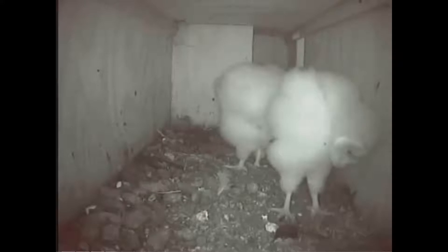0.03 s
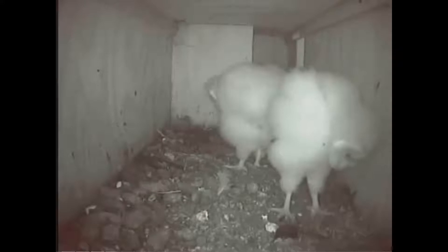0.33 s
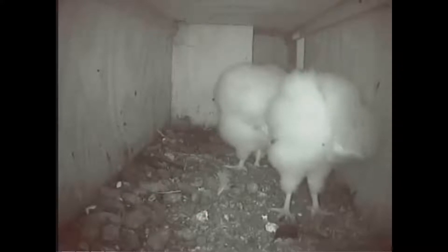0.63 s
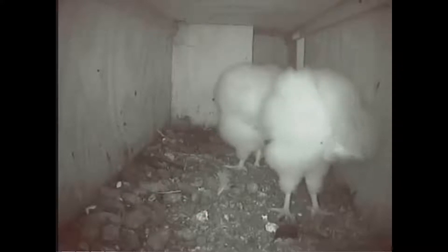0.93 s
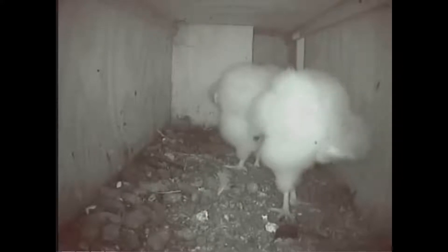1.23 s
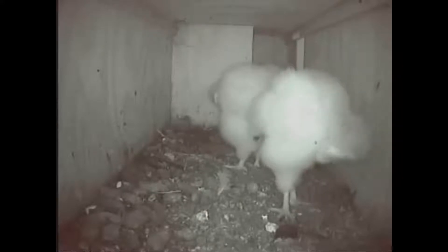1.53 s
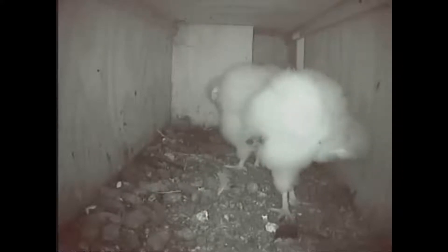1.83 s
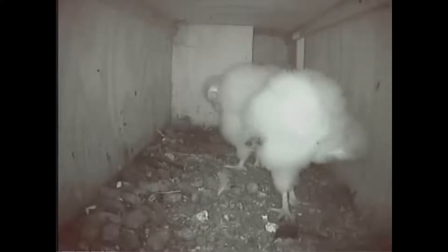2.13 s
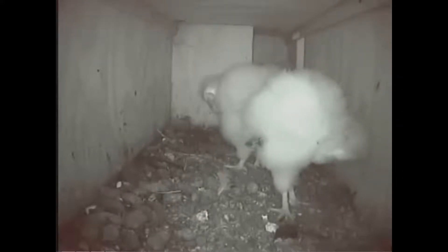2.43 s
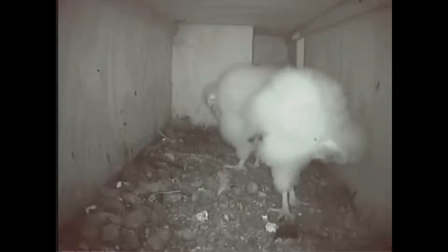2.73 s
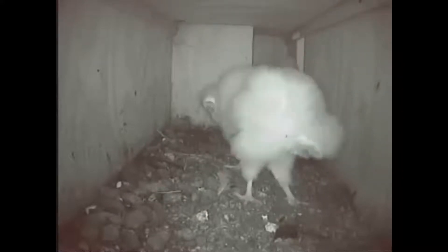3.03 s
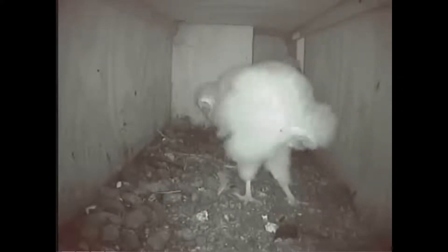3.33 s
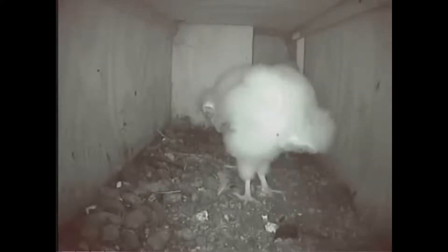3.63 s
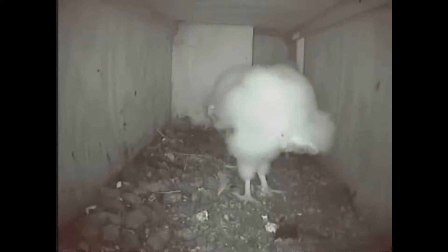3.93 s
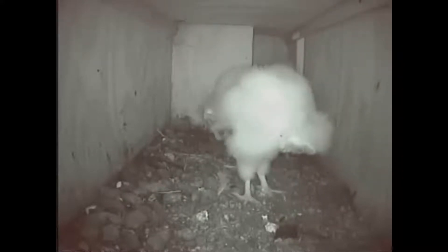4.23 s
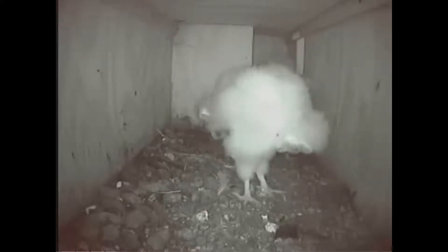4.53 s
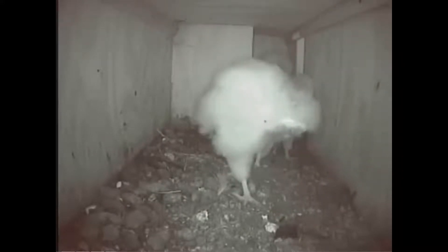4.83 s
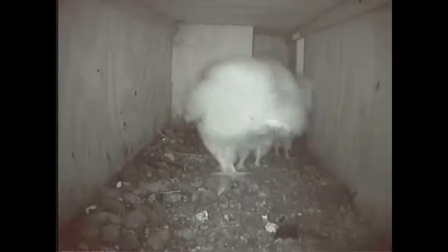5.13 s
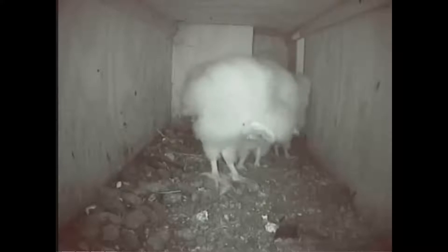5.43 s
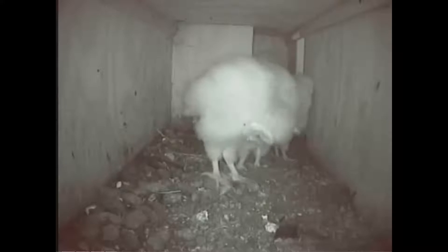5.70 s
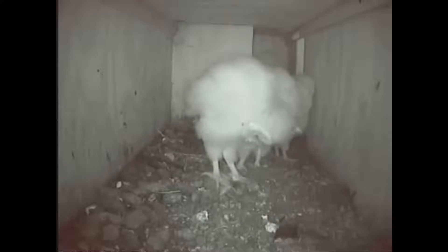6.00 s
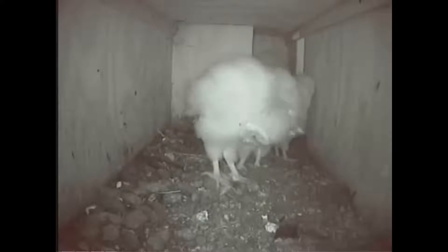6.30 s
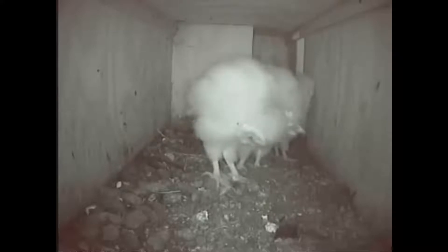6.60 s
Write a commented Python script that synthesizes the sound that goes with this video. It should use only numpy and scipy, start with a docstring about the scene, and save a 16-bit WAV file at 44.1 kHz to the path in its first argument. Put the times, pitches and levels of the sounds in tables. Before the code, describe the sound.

Owl chicks are heard close up through a small microphone inside a wooden nest box, over a steady low rumble and faint hiss. From about 0.3 to 0.7 seconds comes a harsh, breathy begging rasp that swells and sags, with a hollow ring and faint thin whistles in it. Around 1 second a foot knocks softly on the floor board and crunches dry litter. More steps land at 2.7 and 3.4 seconds, each a short cluster of hollow thumps. A second rasp runs from 3.8 to 4.2 seconds. The feet then get busier, with steps at 4.4, 4.7, 5.0 and 5.4 seconds, the firmest near 4.7, along with tiny claw ticks and very faint feather rubbing. A third, slightly softer rasp lasts from 5.5 to 5.9 seconds. After that, little but the rumble and hiss remains until the end, near 7 seconds.

```python
"""Inside a wooden nest box, a small camera microphone hears two owl chicks.
They beg with three long rasping hisses: breath is chopped up in the voice box, shaped by throat
and beak, and rings between the walls. Between the calls they shift their feet: claws crunch in
the litter, the floor board knocks and booms, and downy feathers rub softly.
A steady low rumble and faint hiss lie under everything."""
import sys
import numpy as np
from scipy import signal
from scipy.fft import rfft, irfft
from scipy.io import wavfile
from scipy.ndimage import uniform_filter1d

SR = 44100
rng = np.random.default_rng(int(sys.argv[2]) if len(sys.argv) > 2 else 0)


def wav_out(sig):
    """Save sig, one row per channel (or a flat mono array), as 16-bit PCM at SR to the path in sys.argv[1]."""
    wavfile.write(sys.argv[1], SR, np.round(np.clip(np.atleast_2d(sig).T, -1, 1) * 32767).astype(np.int16))


N = 298116
TIME = np.arange(N) / SR
FREQS = np.maximum(np.arange(N // 2 + 1) * SR / N, 1)


def from_db(db):
    """Turn decibels into a number to multiply by."""
    return 10 ** (np.asarray(db) / 20)


def rms_one(x):
    """Scale a signal so that its average strength (rms) is 1."""
    return x / np.sqrt(np.mean(x ** 2) + 1e-20)


def tone_curve(points):
    """Join a few (frequency, level) points into a gain for every frequency."""
    hz, db = np.transpose(points)
    return from_db(np.interp(np.log(FREQS), np.log(hz), db))


def colour(x, gain):
    """Turn each frequency up or down by its gain."""
    return irfft(rfft(x) * gain, N)


def flutter(per_s):
    """A smooth random wobble of typical size 1; a higher per_s makes it quicker."""
    return rms_one(colour(rng.standard_normal(N), np.exp(-(FREQS / per_s) ** 2)))


def swells(rows, level_db):
    """A loudness curve with one smooth bump for each row."""
    return sum(from_db(db + level_db) * np.exp(-((TIME - s) / half_s) ** 2) for s, half_s, db in rows)


# Tone of the background noise: (frequency [Hz], relative level [dB])
BACKGROUND_TONE = [(12, -6), (24, 1), (42, 2), (58, -6), (80, -8.5), (120, -10), (200, -16), (320, -24),
                   (600, -29.5), (1200, -33.5), (2500, -35), (5000, -37), (6500, -38.5), (7200, -43.5)]

def background_noise(level_db):
    """A steady low rumble and faint hiss lie under everything."""
    return from_db(level_db) * rms_one(colour(rng.standard_normal(N), tone_curve(BACKGROUND_TONE)))


# Notes at which the air in the box rings: (pitch [Hz], width [Hz], boost [dB])
BOX_NOTES = [(483, 33, 13), (579, 54, 10.5), (770, 9.5, 4), (872, 42, 8.5), (1027, 11, 8), (1062, 97, 4.5),
             (1102, 11, 3.5), (1380, 190, 8), (1483, 18, 2.5), (2340, 35, 4.5), (2570, 27, 3),
             (2690, 24, 7), (2940, 26, 5), (3070, 13, 7.5), (3170, 85, 6.5), (4010, 30, 7), (4385, 38, 3.5),
             (5100, 35, 5), (5800, 45, 5)]

def box_ring(direct):
    """Sound bounces between the walls, so some notes ring on top of the direct sound."""
    out = direct
    for hz, width_hz, boost_db in BOX_NOTES:
        b, a = signal.iirpeak(hz, hz / width_hz, fs=SR)
        out = out + (from_db(boost_db) - 1) * signal.lfilter(b, a, direct)
    return out


# How restless the chicks are: (time [s], relative level [dB])
RESTLESSNESS = [(0.1, -64), (0.35, -63.5), (1.9, -64.5), (2.6, -61.5), (2.85, -64.5), (3.06, -67),
                (4.86, -63.5), (6.65, -68)]
# Single firmer rubs: (middle time [s], half length [s], relative level [dB])
FIRM_RUBS = [(0.872, 0.094, -73.5), (2.878, 0.031, -77), (4.719, 0.01, -53.5), (5.365, 0.031, -56.5)]
# Tone of the rubbing: (frequency [Hz], relative level [dB])
RUB_TONE = [(50, -23.5), (110, 5), (200, 0.5), (300, 1.5), (420, -15), (600, -21.5), (1200, -25),
            (2500, -70), (7000, -35.5)]

def shuffle(level_db, rubs_db, uneven_db):
    """Soft feathers and toes rub the floor in faint uneven strokes, a few of them firmer."""
    times, restless_db = np.transpose(RESTLESSNESS)
    level = from_db(np.interp(TIME, times, restless_db) + level_db) + swells(FIRM_RUBS, rubs_db)
    rub = rng.standard_normal(N) * from_db(uneven_db * flutter(per_s=31))
    return level * rms_one(box_ring(colour(rub, tone_curve(RUB_TONE))))


# Claw tips catching: (time [s], level [dB])
CLAW_CATCHES = [(0.982, -71), (.998, -75), (2.741, -76), (3.374, -75), (3.408, -67), (4.727, -65.5),
                (4.750, -62)]

def claw_ticks(pitch_hz, rise_s):
    """A claw tip catches on something hard and gives a tiny ping."""
    out = 0
    for s, db in CLAW_CATCHES:
        age = np.clip(TIME - s, 0, 1)
        level = from_db(db) * age / rise_s * np.exp(1 - age / rise_s)
        out = out + level * np.sin(2 * np.pi * pitch_hz * age)
    return out


# Notes of the floor board: (pitch [Hz], relative level [dB], time to fade by 60 dB [s])
BOARD_NOTES = [(48.3, -3.5, .42), (60.3, -12, 0.56), (72.7, -10.5, .36), (89, -10, 0.057),
               (97.3, -14, 0.51), (127.2, -10.5, 0.2), (170.4, -7, 0.24), (194.7, 3.5, 0.14),
               (226, 1, 0.082), (288.3, 3.5, 0.12), (327, -5, 0.14), (409, -8.5, 0.08), (477, 3, 0.066),
               (575, 2.5, .09), (599, -7, .13), (890, -4.5, 0.045), (1150, -14, .03)]
# Each step is a list of touches, as the foot rolls from claws and toes to the body's full weight:
# (time [s], relative knock level [dB], pitch that this spot favours [Hz], relative crunch level [dB])
STEPS = [
    [(.843, -58, 405, -64), (.877, -57, 350, -59), (.908, -51, 327, -69)],
    [(.9847, -43.5, 513, -48), (.991, -46.5, 485, -59), (.9971, -38, 312, -48), (1.0067, -39.5, 226, -57.5),
     (1.013, -32.5, 59, -65), (1.0266, -31, 82, -74)],
    [(2.740, -52, 283, -49), (2.7467, -37, 370, -64), (2.7501, -42, 324, -60), (2.7527, -40, 415, -72),
     (2.7568, -46, 442, -71), (2.7635, -38, 63, -68), (2.769, -38, 305, -52.5)],
    [(3.3491, -40, 340, -56), (3.3522, -38.5, 326, -68), (3.3722, -28, 262, -45), (3.375, -41, 600, -55),
     (3.3801, -27, 169, -74)],
    [(3.411, -51, 110, -50), (3.4142, -35.5, 48.3, -63), (3.4186, -34.5, 373, -59),
     (3.4281, -35, 54.5, -73.5)],
    [(4.3775, -50, 840, -56.5), (4.3798, -34.5, 432, -54), (4.383, -47, 1010, -54), (4.3932, -30, 271, -64),
     (4.4002, -27.5, 148, -64), (4.4118, -38, 406, -72), (4.4166, -45, 138, -77),
     (4.4257, -36.5, 51.2, -80)],
    [(4.7268, -45, 133, -47), (4.728, -45, 481, -60), (4.7366, -25.5, 125.6, -62), (4.7502, -26, 291, -47),
     (4.7556, -32, 365, -49), (4.7699, -38.5, 102, -55), (4.7968, -35, 64.3, -80)],
    [(4.9872, -34.5, 117, -52.5), (4.9925, -35.5, 380, -64), (5.0014, -37, 77.4, -61)],
    [(5.0472, -37, 77.3, -76), (5.057, -41, 333, -50), (5.059, -50, 1090, -58), (5.0649, -35, 133, -64),
     (5.0658, -38, 75, -67), (5.074, -46, 199, -55)],
    [(5.3085, -42.5, 126, -73), (5.358, -39.5, 417, -60), (5.3643, -39, 164, -55), (5.371, -49, 490, -55),
     (5.381, -42, 330, -61), (5.3817, -36.5, 120, -65)],
]

def board_knocks(level_db, thud, spot_db, spot_octaves, push_cycles):
    """Each foot bends the board and lets go; the slower the push, the lower the notes it wakes."""
    t, out = TIME[:SR // 2], np.zeros(N)
    hz, note_db, fade_s = np.transpose(BOARD_NOTES)
    rings = from_db(-60 * t / fade_s[:, None]) * np.cos(2 * np.pi * hz[:, None] * t)
    for s, peak_db, spot_hz, _ in np.concatenate(STEPS):
        favour_db = spot_db * np.exp(-(np.log2(hz / spot_hz) / spot_octaves) ** 2)
        board = from_db(note_db + favour_db + rng.standard_normal(len(hz))) @ rings
        board = board + thud * np.exp(-t / 0.0004)  # the litter gives way with a dead thud
        progress = t * spot_hz / push_cycles
        soft_landing = np.sqrt(np.sin(np.pi * progress).clip(0)) * (progress < 1)
        push = np.sin(2 * np.pi * progress) * soft_landing
        knock = signal.fftconvolve(push, board)[:len(t)]
        at = round(s * SR)
        out[at:at + len(t)] += from_db(peak_db + level_db) * knock / np.abs(knock).max()
    return out


# Tone of the dry litter on the floor: (frequency [Hz], relative level [dB])
LITTER_TONE = [(150, -12), (400, 7.5), (600, 7), (760, -5.5), (1200, -3), (1500, -13.5), (2100, -25.5),
               (3100, -25), (7000, -47)]

def litter_crunch(level_db, rise_s, fall_s, grain_db):
    """At each touch in STEPS, dry pellets crumble under the claws in a short burst of grains."""
    power = 0
    for s, *_, crunch_db in np.concatenate(STEPS):
        age = np.clip(TIME - s, 0, 1)
        burst = from_db(crunch_db) * (1 - np.exp(-age / rise_s)) * np.exp(-age / fall_s)
        power = power + burst ** 2
    grains = rms_one(rng.standard_normal(N) * from_db(grain_db * flutter(per_s=180)))
    return from_db(level_db) * colour(grains * np.sqrt(power), rms_one(tone_curve(LITTER_TONE)))


# Moments when a call turns hollow: (middle time [s], half length [s], relative level [dB])
HOLLOW_MOMENTS = [(0.35, 0.033, -56), (.475, .035, -56), (.595, 0.068, -53.5), (0.676, 0.031, -51),
                  (4.004, 0.014, -47.5), (4.122, 0.017, -58), (5.694, 0.014, -59), (5.913, 0.027, -60)]

def hollow_ring(level_db, waver_hz):
    """The lowest note of the air in the box swells into a hollow tone under the rasp."""
    hz = BOX_NOTES[0][0] + waver_hz * flutter(per_s=77)
    return swells(HOLLOW_MOMENTS, level_db) * np.sqrt(2) * np.sin(2 * np.pi * np.cumsum(hz) / SR)


# Brief whistles, and the falling chirps that end a call:
# (start [s], end [s], first pitch [Hz], last pitch [Hz], level [dB])
WHISTLE_NOTES = [ (.255, 0.418, 5410, 5250, -76), (0.398, 0.492, 5300, 5280, -75),
                 (.30, .47, 5900, 5840, -80.5), (0.498, 0.621, 6130, 6220, -82),
                 (.28, 0.461, 3065, 2990, -75.5), (.28, 0.432, 593, 616, -60.5),
                 (.385, .49, 1325, 1300, -68.5), (0.665, .715, 1094, 1053, -65),
                 (.698, .720, 2900, 2800, -71), (3.985, 4.054, 1136, 1168, -62),
                 (4.045, 4.085, 5120, 5180, -79), (5.52, 5.577, 3060, 3060, -82),
                 (5.914, 5.929, 3180, 2660, -71)]

def whistles(waver_share):
    """A ringing band of the hiss narrows for a moment into a thin, unsteady tone."""
    out = np.zeros(N)
    waver = 1 + waver_share * flutter(per_s=220)
    for start, end, first_hz, last_hz, db in WHISTLE_NOTES:
        span = slice(round(start * SR), round(end * SR))
        progress = np.linspace(0, 1, len(out[span]))
        hz = (first_hz + (last_hz - first_hz) * progress) * waver[span]
        swell = np.sqrt(progress * (1 - progress)) * 2
        out[span] += from_db(db) * swell * np.sqrt(2) * np.sin(2 * np.pi * np.cumsum(hz) / SR)
    return out


# Bands where throat and beak ring, coloured by where the chick sits; one table for each call:
# (pitch [Hz], rough width [Hz], relative level [dB])
FIRST_VOICE = [(303, 160, 3.5), (457, 230, 0.5), (726, 160, 0.5), (833, 50, 1), (1015, 140, -4),
               (1180, 115, -5.5), (1304, 90, -7.5), (1500, 180, -11), (1700, 91, -12.5), (1940, 79, -14.5),
               (2310, 240, -17.5), (2730, 340, -9.5), (2900, 200, -8.5), (3030, 87, -12), (3260, 280, -15),
               (3900, 640, -32), (4430, 75, -21.5), (4630, 200, -25.5), (4970, 370, -24), (5320, 220, -24),
               (5850, 270, -26.5), (6400, 690, -32.5)]
SECOND_VOICE = [(326, 180, 3), (479, 59, 2.5), (690, 130, -3), (865, 42, -4), (1072, 240, -4.5),
                (1300, 70, -16), (1523, 70, -15), (1750, 160, -18.5), (2040, 150, -22), (2340, 200, -20.5),
                (2790, 250, -18.5), (2980, 150, -21), (3216, 92, -16.5), (3400, 190, -22), (3900, 210, -25),
                (4550, 320, -31.5), (5040, 150, -33), (5250, 220, -28.5), (6040, 490, -32.5),
                (6550, 180, -32.5)]
THIRD_VOICE = [(336, 130, -2.5), (485, 180, -9), (730, 220, -15.5), (947, 130, -8.5), (1158, 57, -9),
               (1348, 38, -17), (1630, 400, -26), (2170, 260, -21), (2370, 190, -18), (2700, 280, -21.5),
               (3016, 200, -16), (3350, 360, -21.5), (4230, 470, -35), (4970, 660, -32), (5800, 410, -33.5),
               (6300, 400, -34.5)]
# How a call's three parts (low throat, middle rasp, high beak hiss) follow the breath:
# (swell factor, usual sag by the end [dB], stops early by [s], fade in [s], fade out [s])
BREATH_RESPONSE = [(1.8, 3, 0.0092, 0.014, 0.039), (2.6, 6, 0.0024, 0.0094, 0.026),
                   (1.6, 3.5, .006, .012, 0.031)]
# The calls: (start [s], hardest push [s], end [s], rasp delay [s], hiss stops earlier by [s],
# base swell of throat and rasp [dB], base swell of hiss [dB], sag factor,
# throat level [dB], rasp level [dB], hiss level [dB], roughness [dB])
BEGGING_CALLS = [ (0.256, 0.557, 0.724, 0.022, 0.017, 4, 3.5, 1.25, -50.5, -61, -71.5, 0.1),
                 (3.757, 4.012, 4.16, 0.0018, 0.012, 4, 5.5, 1.5, -52, -70, -75.5, 0.8),
                 (5.513, 5.805, 5.934, .0011, 0.021, 3, 4, 0.71, -55.5, -66, -76, 0.6)]

def begging_call(beg, voice_bands, glide_share, wander_share):
    """Breath, chopped unevenly by the voice box, rings in throat and beak; it swells, sags and stops."""
    start, push, end, rasp_delay_s, hiss_early_s, swell_db, hiss_swell_db, tiring, *peaks, rough_db = beg
    chop = from_db(rough_db * flutter(per_s=200))
    effort = np.sin(np.pi / 2 * np.clip((TIME - start) / (push - start), 0, 1)) ** 2
    spent = np.clip((TIME - push) / (end - push), 0, 1)
    # the pitch rises with the push and strays a little at random
    bend = glide_share * (effort - spent - .5) + wander_share * flutter(per_s=25.7)
    parts = [(0, 2100, start, end, swell_db),  # throat
             (2100, 3700, start + rasp_delay_s, end, swell_db),  # rasp
             (3700, SR, start, end - hiss_early_s, hiss_swell_db)]  # beak hiss
    out = 0
    for part, peak_db, response in zip(parts, peaks, BREATH_RESPONSE):
        low_hz, high_hz, begin, stop, rise_db = part
        swell_factor, sag_db, early_s, fade_in_s, fade_out_s = response
        level_db = peak_db - swell_factor * rise_db * (1 - effort) - tiring * sag_db * spent
        fade = np.clip(np.minimum((TIME - begin) / fade_in_s, (stop - early_s - TIME) / fade_out_s), 0, 1)
        # each band filters twice, so the gaps between bands stay quiet
        power = sum((from_db(db) / (1 + ((FREQS - hz) / (0.53 * width)) ** 2)) ** 2
                    for hz, width, db in voice_bands if low_hz <= hz < high_hz)
        air = colour(chop * rng.standard_normal(N), np.sqrt(power))
        gliding = np.interp(np.cumsum(1 + bend * fade), np.arange(N), air)  # faster sounds higher
        voice = box_ring(gliding)
        steady = voice / np.sqrt(uniform_filter1d(voice ** 2, size=1800) + 1e-12)  # an even breath
        out = out + fade * from_db(level_db) * steady
    return out


def scene():
    """Calls and feet over the steady background noise, in one channel."""
    calls = sum(begging_call(beg, voice, glide_share=.012, wander_share=.006)
                for beg, voice in zip(BEGGING_CALLS, [FIRST_VOICE, SECOND_VOICE, THIRD_VOICE]))
    calls += whistles(waver_share=.012) + hollow_ring(level_db=-1.0, waver_hz=14.65)
    feet = board_knocks(level_db=-1.0, thud=0.98, spot_db=8.0, spot_octaves=0.27, push_cycles=1.13)
    feet += litter_crunch(level_db=1.5, rise_s=0.0022, fall_s=0.0055, grain_db=5.5)
    feet += claw_ticks(pitch_hz=3100, rise_s=0.0007)
    feet += shuffle(level_db=-4.0, rubs_db=-0.5, uneven_db=2.0)
    return (calls + feet + background_noise(level_db=-60))[None]


def record(dry):
    """The camera cuts the high treble, adds a faint wide hiss and rests slightly above zero."""
    sound_top_hz, hiss_top_hz, hiss_db, offset = 7800, 15800, -94.5, .0197
    treble_cut = signal.cheby2(14, 50, sound_top_hz, fs=SR, output="sos")
    hiss_cut = signal.ellip(10, .1, 70, hiss_top_hz, fs=SR, output="sos")
    hiss = from_db(hiss_db) * rng.standard_normal(N)
    return signal.sosfilt(hiss_cut, signal.sosfilt(treble_cut, dry) + hiss) + offset


dry = scene()
out = record(dry)
wav_out(out)
```